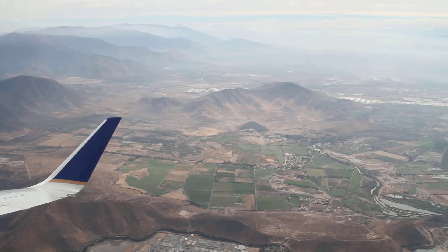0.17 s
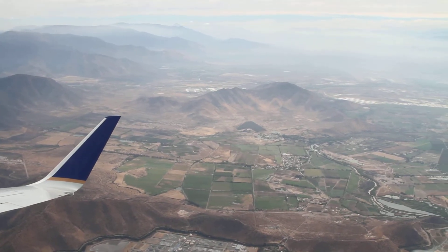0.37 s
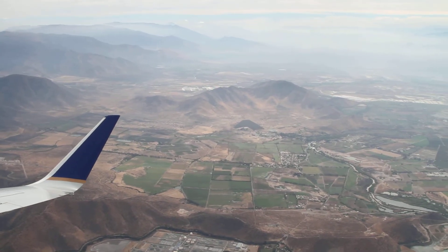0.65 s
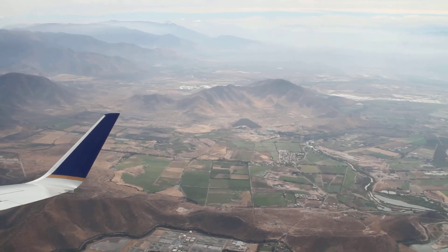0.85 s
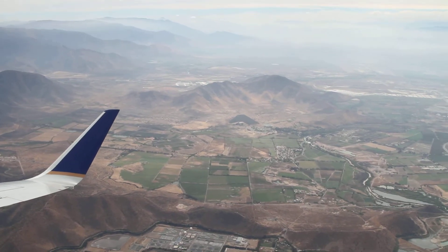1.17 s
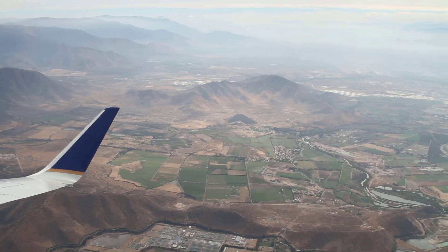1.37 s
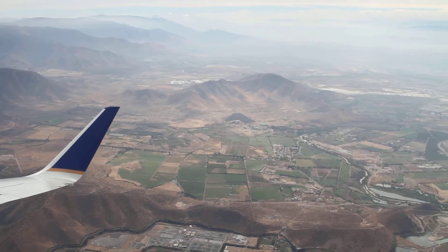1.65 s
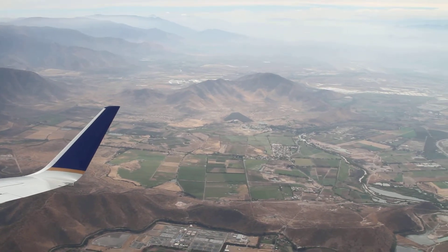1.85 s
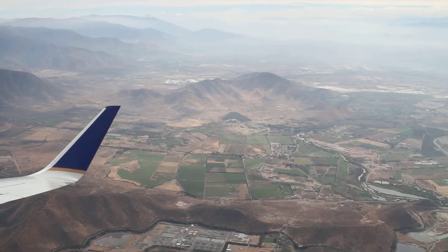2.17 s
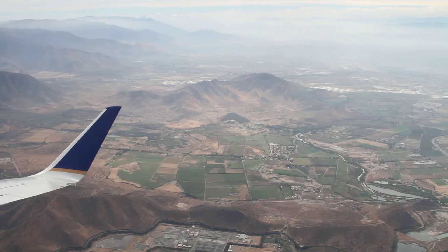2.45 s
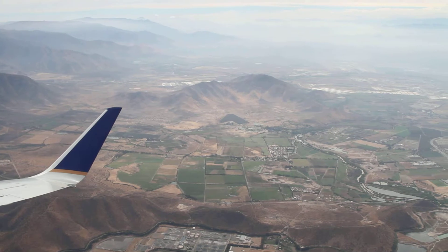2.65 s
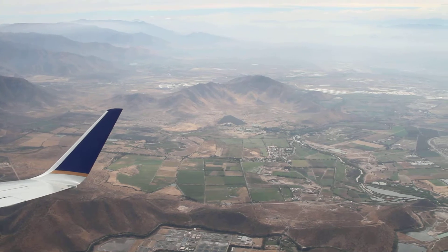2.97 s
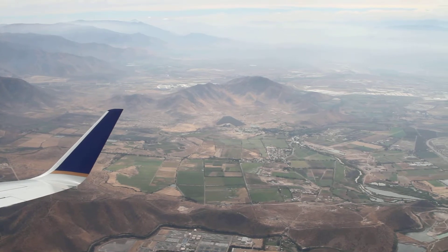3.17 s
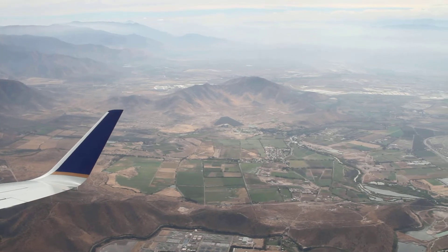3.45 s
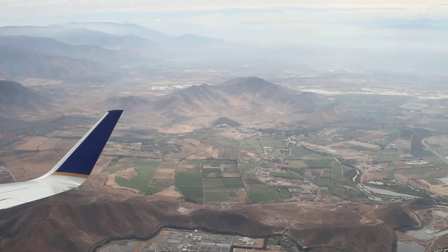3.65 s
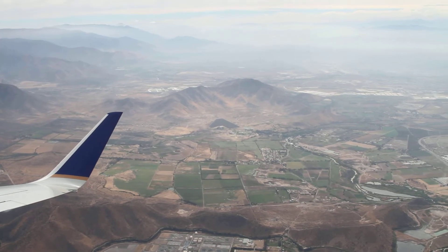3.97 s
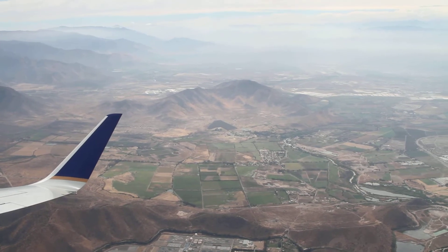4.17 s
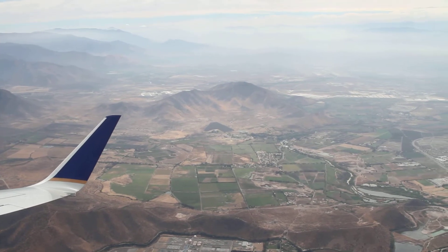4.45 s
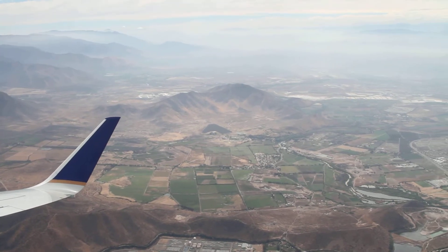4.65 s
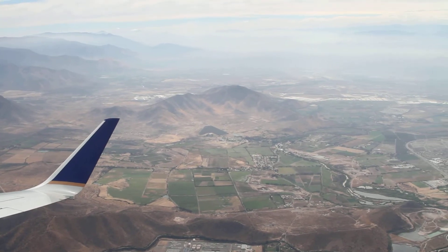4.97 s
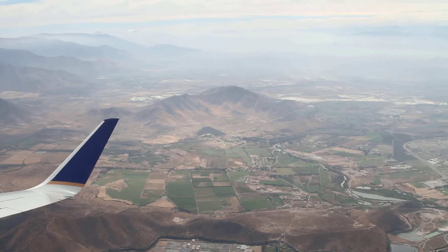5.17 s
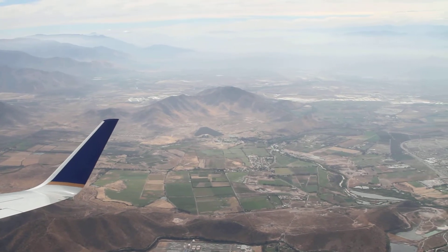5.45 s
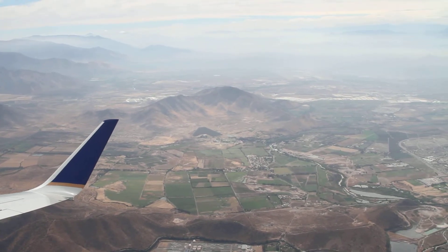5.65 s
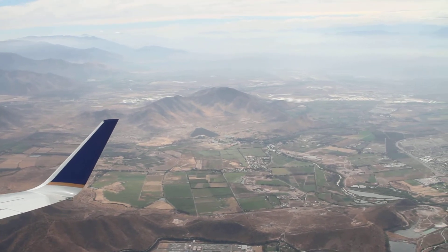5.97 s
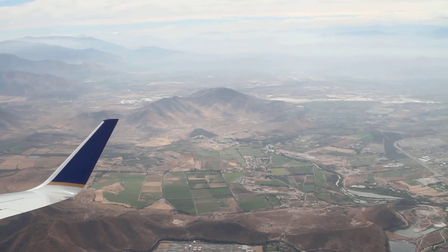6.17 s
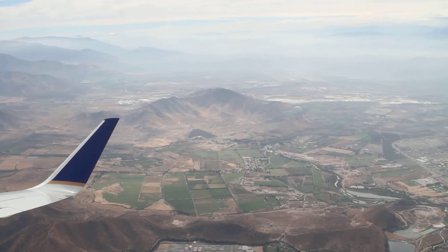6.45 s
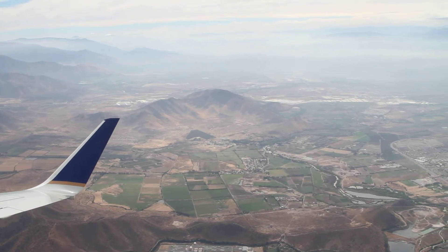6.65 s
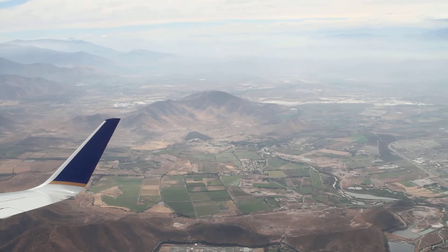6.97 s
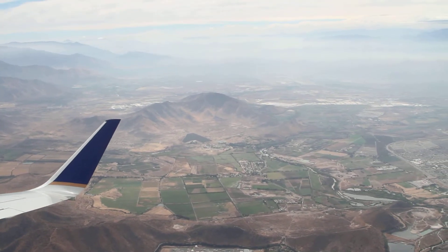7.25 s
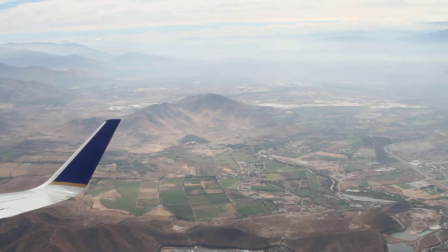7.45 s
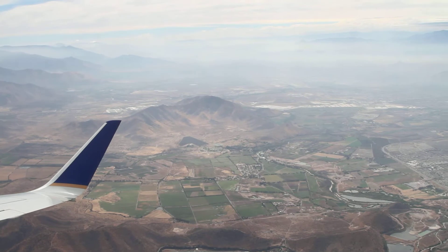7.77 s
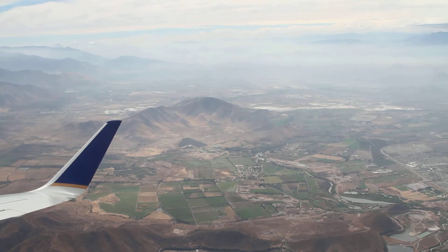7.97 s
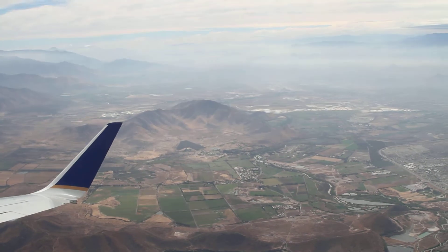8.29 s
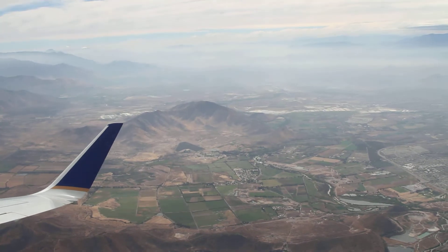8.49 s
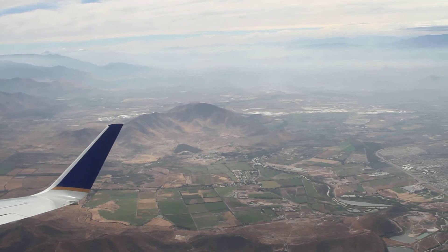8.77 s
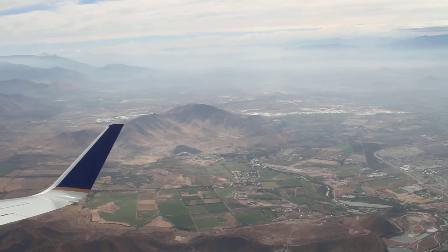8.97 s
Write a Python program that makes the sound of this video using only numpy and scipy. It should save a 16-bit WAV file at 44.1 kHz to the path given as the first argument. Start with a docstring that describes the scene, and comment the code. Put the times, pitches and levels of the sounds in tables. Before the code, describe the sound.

Loud low airliner cabin roar during climb, muffled wind rush and faint vent hiss on top, occasional small clicks, no voices.

```python
"""Window seat by the wing

The cabin of a climbing jet airliner, heard from a seat beside the wing.
Coloured noise makes the exhaust drone, the rush of air along the skin and the hiss of the vents.
Narrow noise bands make the shaft hum and engine tones, and sines make thin electrical whines.
Short noise bursts make trim ticks, one microphone overload crackle, rustles and squeaks."""
import sys
import numpy as np
from scipy import signal
from scipy.fft import rfft, irfft, next_fast_len
from scipy.io import wavfile
from scipy.ndimage import uniform_filter1d

SR = 44100
rng = np.random.default_rng(int(sys.argv[2]) if len(sys.argv) > 2 else 0)


def bounce(signal):
    """Save signal as a 16-bit WAV file at the path given by the first command-line argument."""
    frames = np.transpose(np.atleast_2d(signal))
    limited = np.clip(frames, -1, 1)
    pcm = np.round(limited * 32767).astype(np.int16)
    wavfile.write(sys.argv[1], SR, pcm)


N = 402179
TIME = np.arange(N) / SR   # s
FREQS = np.maximum(np.arange(N // 2 + 1) * SR / N, 1)   # Hz


def from_db(db):
    """Decibels to gain."""
    return 10 ** (np.asarray(db) / 20)


def rms_one(x):
    """Scale to unit rms."""
    return x / np.sqrt(np.mean(x ** 2) + 1e-20)


def in_time(rows):
    """Each column of a curve, drawn in straight lines over every sample."""
    s, *columns = np.transpose(rows)
    return [np.interp(TIME, s, column) for column in columns]


def colour(points):
    """Gain at every frequency, falling 60 dB per octave more outside the given points."""
    hz, db = np.transpose(points)
    octaves_outside = np.abs(np.log2(FREQS / np.clip(FREQS, hz.min(), hz.max())))
    inside_db = np.interp(np.log(FREQS), np.log(hz), db)
    return from_db(inside_db - 60 * octaves_outside)


def bell(hz, width):
    """Resonance-shaped curve over frequency: 1 on top, one half at width / 2 to either side."""
    return 1 / (1 + (2 * (FREQS - hz) / width) ** 2)


def noise(gain):
    """Noise with the given relative gain at every frequency; rms 1."""
    size = next_fast_len(N)
    gain = np.interp(np.arange(size // 2 + 1) * SR / size, FREQS, gain)
    spectrum = rfft(rng.standard_normal(size)) * gain
    return rms_one(irfft(spectrum, size)[:N])


def steady(x, seconds):
    """Even out slow changes of level and keep the fast flutter."""
    size = max(int(seconds * SR), 2)
    local_power = uniform_filter1d(uniform_filter1d(x ** 2, size), size)
    return x / np.sqrt(local_power + 1e-12)


def puff(s, db, spread):
    """One smooth bell-shaped rise and fall of level around its peak."""
    return from_db(db) * np.exp(-.5 * ((TIME - s) / spread) ** 2)


def clicks():
    """Short sharp clicks: noise that starts at once and dies away exponentially."""
    # cabin trim ticks, and at 6.869 s an overload crackle of the microphone:
    # t/s, rms level at the start/dB, decay to 1/e/s
    click_events = [(1.735, -26, 0.01), (1.775, -36, 0.041), (3.399, -37, 0.032), (6.869, -31, .007)]
    # tone of the clicks: f/Hz, relative level/dB
    click_colour = [(500, -10), (850, 16), (1300, 1), (2000, -7), (3700, -8), (5000, -25), (15000, -34)]
    envelope = 0
    for s, db, decay in click_events:
        envelope = envelope + from_db(db) * (TIME >= s) * np.exp(-np.abs(TIME - s) / decay)
    return envelope * noise(colour(click_colour))


def rustles():
    """Brief soft rustles: bright noise that swells and fades."""
    # each rustle: peak t/s, rms level at the peak/dB, spread either side/s
    rustle_events = [(1.442, -56, .02), (6.578, -52, .009)]
    # tone of the rustles: f/Hz, relative level/dB
    rustle_colour = [(4500, -33), (5600, 2), (7000, -6), (9000, -3), (13000, -7), (15500, -12)]
    envelope = sum(puff(s, db, spread) for s, db, spread in rustle_events)
    return envelope * noise(colour(rustle_colour))


def squeaks():
    """Faint seat squeaks: noise around one pitch each, swelling and fading."""
    # each squeak: peak t/s, rms level at the peak/dB, spread either side/s, f/Hz
    squeak_events = [(6.58, -56, .012, 5600), (9.025, -63, .025, 6280)]
    return sum(puff(s, db, spread) * noise(bell(hz, width=340)) for s, db, spread, hz in squeak_events)


def whine(flutter_db):
    """Electrical whine: sine partials of one steady pitch, each fluttering in level on its own."""
    base_hz = 580.3
    # steady low partials: multiple of the base pitch, rms level before flutter/dB
    low_partials = [(2, -59.5), (3, -65.5)]
    # two shrill partials: t/s, fifth multiple level/dB, twenty-seventh multiple level/dB (rms, before flutter)
    shrill_levels = [(0.0, -62, -71), (0.51, -58, -72), (1.65, -61.5, -81), (2.08, -59, -81),
                     (2.91, -59.5, -74), (5.22, -61, -75), (5.78, -61, -72), (7.55, -54, -72),
                     (8.36, -62, -74), (9.1, -67, -74)]
    fifth_db, top_db = in_time(shrill_levels)
    out = 0
    for multiple, db in [*low_partials, (5, fifth_db), (27, top_db)]:
        phase = 2 * np.pi * (multiple * base_hz * TIME + rng.random())
        flutter = flutter_db * noise(bell(0, width=15) ** 2)
        out = out + np.sqrt(2) * from_db(db + flutter) * np.sin(phase)   # sqrt(2): rms to peak
    return out


def engines():
    """Shaft, fan blade and compressor tones, narrow noise that wavers through the air stream."""
    # each tone: f/Hz, rms level/dB, width/Hz
    engine_tones = [(82.6, -36, 2), (1977, -67, 4), (4110, -76, 5), (4189, -75, 5), (4497, -70.5, 2)]
    return sum(from_db(db) * steady(noise(bell(hz, width)), seconds=.4) for hz, db, width in engine_tones)


def vent_hiss(cabin, treble_db):
    """Vent air: high noise that flutters with the treble."""
    # tone of the hiss ahead of the cabin: f/Hz, relative level/dB
    hiss_colour = [(1880, -32), (3200, -0.5), (4630, 0.5), (5000, -5.5), (7710, -13), (13000, -11.5),
                   (15000, -16)]
    return from_db(-52.5 + treble_db) * noise(colour(hiss_colour) * cabin)


def skin_rush(cabin, flow_db, treble_db):
    """Skin turbulence: buffeting swells its low part, its bright part follows the calmer hiss."""
    # tone of the rush ahead of the cabin: f/Hz, relative level/dB
    rush_colour = [(240, -47), (400, 0), (464, -5.5), (538, -5), (824, -16), (1060, -19.5), (1180, -21.5),
                   (1290, -24.5), (1830, -29), (2000, -30), (2640, -32.5), (2810, -27.5), (3200, -41.5),
                   (4160, -63), (7040, -120)]
    rush_db = -31.5   # rms of both parts together, at 0 dB airflow
    stream = noise(colour(rush_colour) * cabin)
    low_pass = signal.butter(2, 950, fs=SR, output="sos")
    low = signal.sosfiltfilt(low_pass, stream)
    even_low = np.std(low) * steady(low, seconds=.25)
    buffet = from_db(rush_db + flow_db) * even_low
    bright = from_db(rush_db + treble_db) * (stream - low)
    return buffet + bright


def exhaust_drone(cabin, flow_db):
    """Exhaust roar through the fuselage: deep noise that swells less than the air stream."""
    # tone of the drone ahead of the cabin: f/Hz, relative level/dB
    drone_colour = [(21, -49), (36, -25), (70, -12.5), (107, -6.5), (146, -1.5), (196, 0), (228, -0.5),
                    (259, -2.5), (324, -1.5), (340, -4), (369, -10.5), (400, -17), (520, -38.5),
                    (880, -120)]
    level = from_db(-13.5 + 0.44 * flow_db)   # gains 0.44 dB per dB of airflow
    return level * steady(noise(colour(drone_colour) * cabin), seconds=0.3)


def airframe():
    """Roar, rush and hiss swell with one air stream, all coloured by the cabin's resonances."""
    # resonances and notches of the cabin and its wall panels: f/Hz, width/Hz, boost/dB
    cabin_modes = [(47.6, 8, 4), (171, 8.6, 1), (204.5, 7, 1), (227, 11, 3), (323.4, 4.6, 5),
                   (331.7, 9.2, 2.5), (360, 18, -0.5), (530, 56, 2.5), (702, 96, 3.5), (830, 51, 5),
                   (1180, 81, 4.5), (1387, 66, 3), (2025, 110, 4), (2230, 100, 4), (2417, 120, 5.5),
                   (2610, 60, 5), (2740, 73, 1), (3140, 220, 0), (4430, 120, -3.5), (4640, 110, -1.5),
                   (5300, 180, 2.5), (6460, 300, 2), (10980, 400, 3.5), (12960, 400, 3)]
    # slow strength of the air stream along the fuselage: t/s, level/dB
    airflow = [(0.0, -0.9), (0.62, 1.5), (1.35, -1.2), (1.94, -0.8), (2.23, 1.5), (3.05, -2.5), (3.3, 2),
               (3.88, 2.1), (3.98, -2), (4.38, 1), (4.86, -1.5), (5.98, 0), (7.04, 1), (7.3, -1.5),
               (7.52, 2.3), (7.82, -0.5), (8.79, -1.2), (8.97, 2.0), (9.1, 1)]
    cabin = from_db(sum(db * bell(hz, width) for hz, width, db in cabin_modes))
    # quick eddies ride on the air stream, 0.53 dB rms
    slow_db, = in_time(airflow)
    flow_db = slow_db + 0.53 * noise(bell(0, width=25) ** 2)
    # the smallest eddies make the whole treble flutter together, 0.35 dB rms
    treble_db = 0.67 * flow_db + 0.35 * noise(bell(0, width=27) ** 2)
    hiss = vent_hiss(cabin, treble_db)
    rush = skin_rush(cabin, flow_db, treble_db)
    return hiss + rush + exhaust_drone(cabin, flow_db)


def scene():
    """Everything as heard at the seat, in one channel."""
    small_sounds = clicks() + rustles() + squeaks()
    return (small_sounds + whine(flutter_db=1.0) + engines() + airframe())[None]


def record(dry):
    """One microphone channel: full scale clips the peaks and the top is cut steeply at 15.7 kHz."""
    top_cut = signal.ellip(12, .1, 80, 15700, fs=SR, output="sos")
    return signal.sosfiltfilt(top_cut, np.clip(dry, -1, 1), padlen=2000)


dry = scene()
out = record(dry)
bounce(out)
```